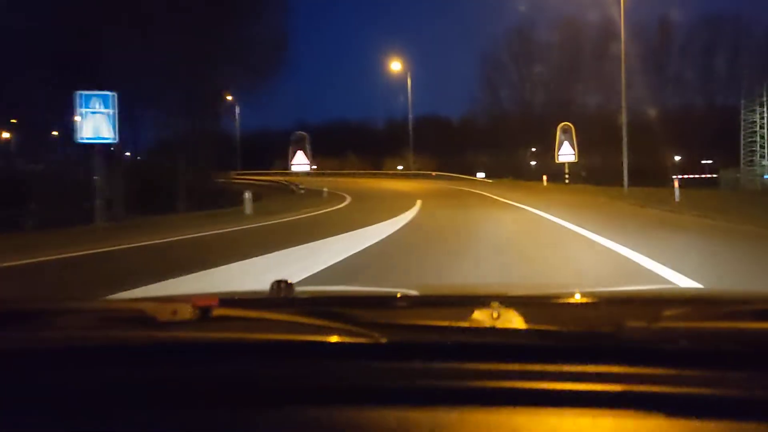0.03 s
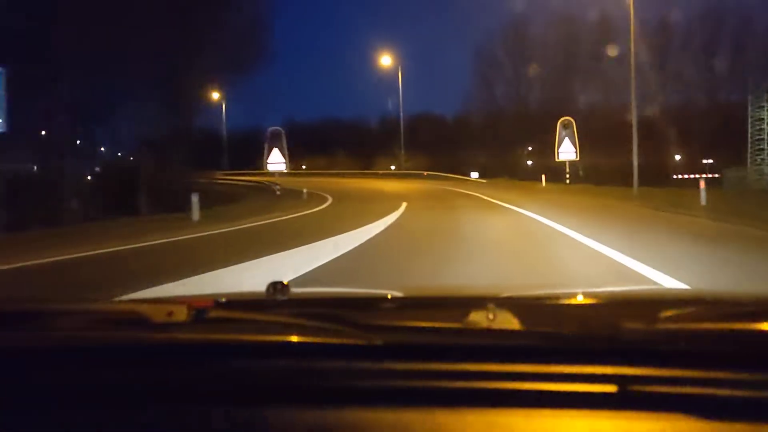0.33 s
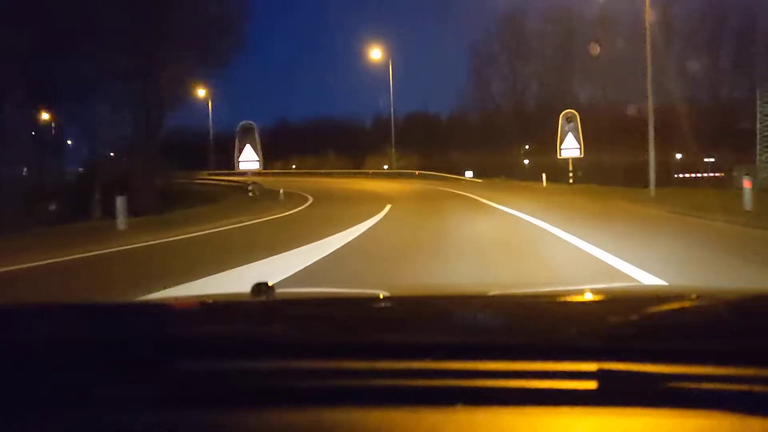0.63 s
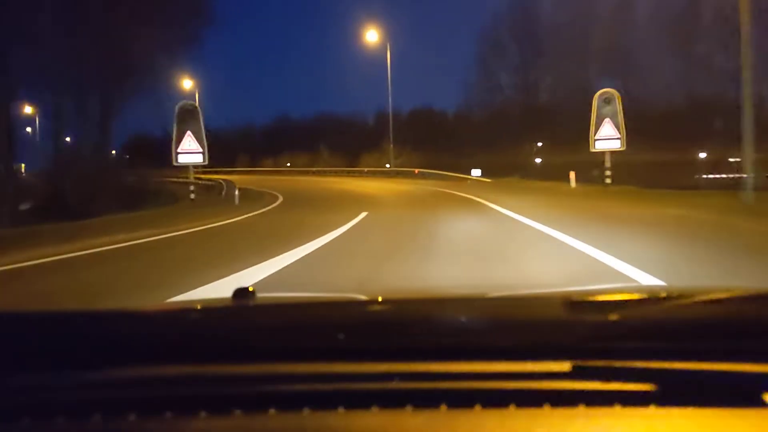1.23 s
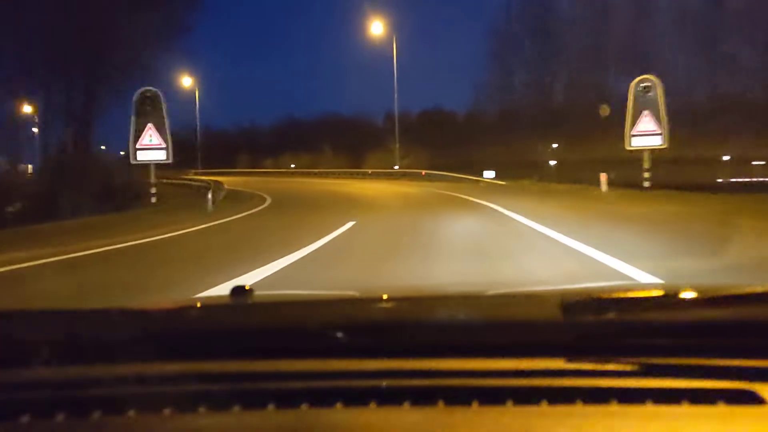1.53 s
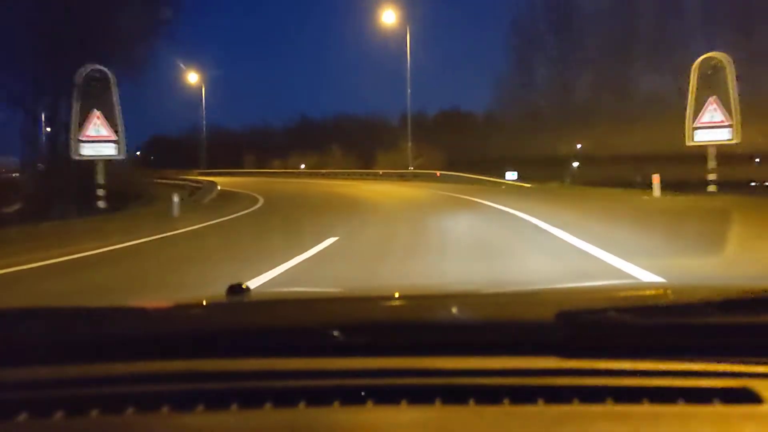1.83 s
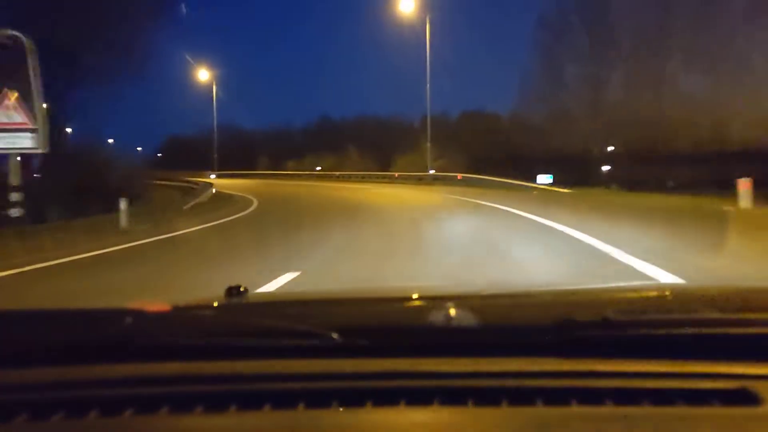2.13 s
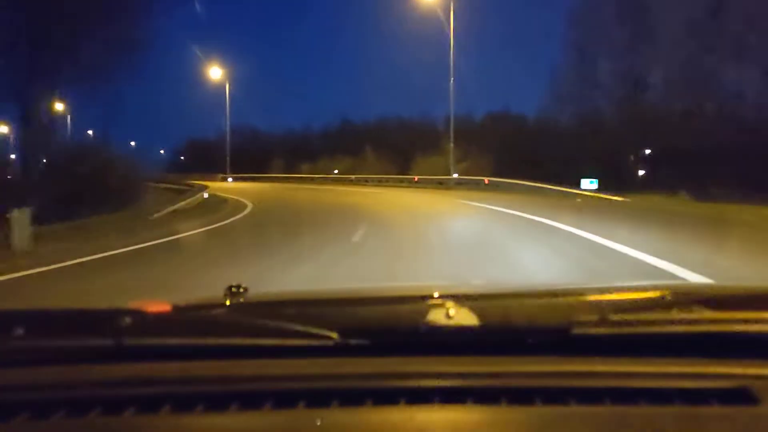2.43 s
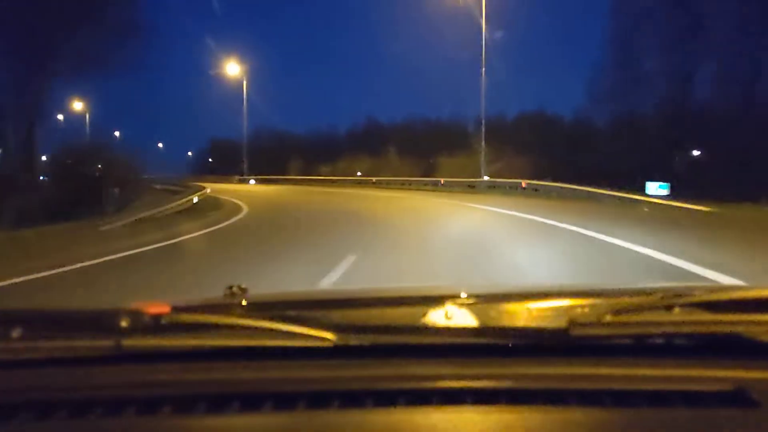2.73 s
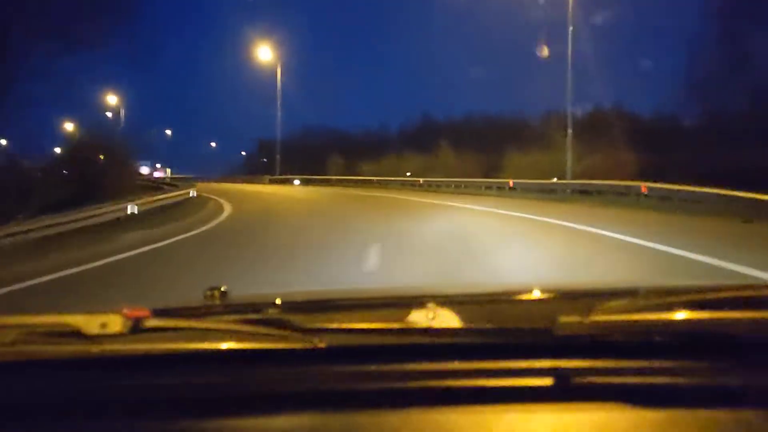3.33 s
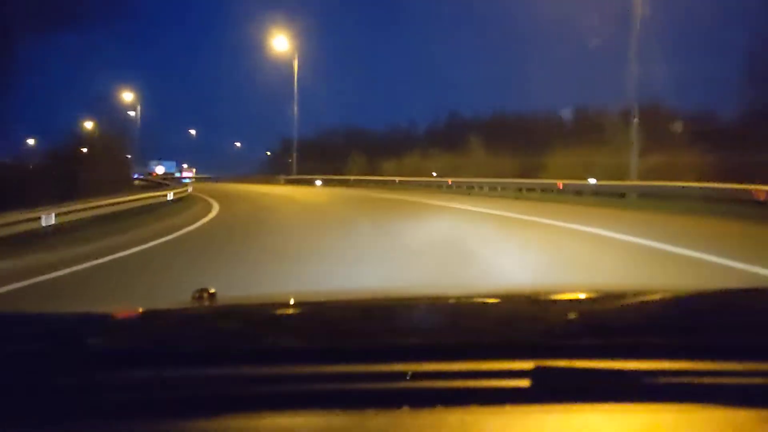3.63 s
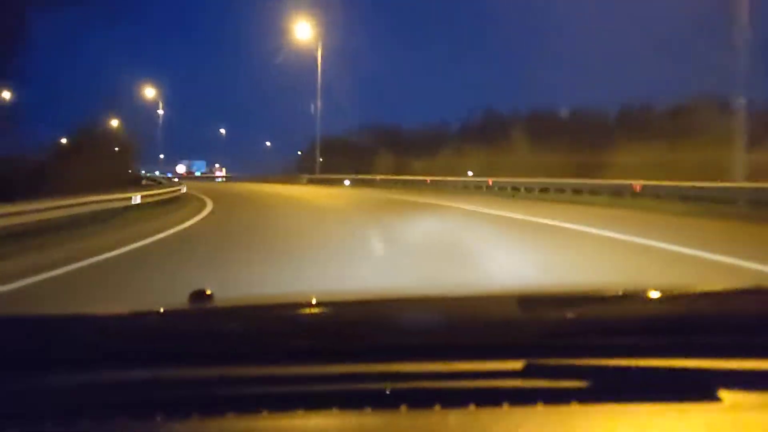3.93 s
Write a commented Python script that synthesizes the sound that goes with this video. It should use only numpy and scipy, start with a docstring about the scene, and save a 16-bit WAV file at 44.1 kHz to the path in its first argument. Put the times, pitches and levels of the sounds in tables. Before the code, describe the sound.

A turbocharged car engine accelerates, heard from inside, its deep drone climbing over road rumble with a faint rising whistle. A sharp click comes at 1.4 seconds, and the trim rattles faintly near 2.6 and 3 seconds. At 3.3 seconds the throttle shuts with three quick fluttering chuffs of air, then a hiss. Until 4 seconds the revs sink, the exhaust burbles and a hum remains.

```python
"""Inside a turbocharged six-cylinder car pulling hard through a bend. From the start, the harmonics of
the crankshaft's rotation climb as an exhaust drone over road rumble, and the turbo whistles upward.
A sharp click comes at 1.4 s; later the trim rattles faintly. At 3.3 s the throttle shuts: the trapped
boost escapes in three fluttering chuffs, then a long hiss, and rings the intake pipes. To the end the
revs sink, the exhaust burbles and a hum stays in the cabin."""
import sys
import numpy as np
from scipy import signal
from scipy.io import wavfile

SR = 44100
rng = np.random.default_rng(int(sys.argv[2]) if len(sys.argv) > 2 else 0)


def to_wav(s):
    """Save 16-bit WAV."""
    ch = np.atleast_2d(s).T  # columns
    pcm = np.round(np.clip(ch, -1, 1) * 32767)  # PCM
    wavfile.write(sys.argv[1], SR, pcm.astype(np.int16))


N = 176400
T = np.arange(N) / SR

# Stereo image of noise. Each row: frequency in Hz, left-right correlation (clipped at 1).
COHERENCE = [(270, 1.1), (500, 0.5), (1000, -0.03)]
# Each row: frequency in Hz, left minus right in dB.
SIDE_BALANCE = [(900, -0.4), (2200, 3), (6000, 2)]

# Noise spectra. Each row: frequency in Hz, relative spectral density in dB.
ROAD_SPECTRUM = [(28, -16), (55, 0.5), (100, -5), (170, -4.5), (300, -8.5), (430, -17), (560, -28.5),
                 (780, -22.5), (1400, -41)]
INTAKE_SPECTRUM = [(2000, -7.5), (3500, 3), (6400, -1.5), (7600, -7), (9500, -7.5), (11500, -16)]
CHUFF_SPECTRUM = [(900, -9), (2000, -1), (2900, 6.5), (4300, -7.5), (7300, -11.5), (10000, -25),
                  (15000, -30)]
HISS_SPECTRUM = [(2000, -3), (4000, 2.5), (7000, -2.5), (10000, -10), (12000, -17)]
ROAR_SPECTRUM = [(200, -7.5), (380, 4), (540, -2), (780, -6), (1100, -10.5), (1600, -13.5), (2200, -17.5),
                 (3300, -16.5)]

# Noise envelopes. Each row: time in seconds, level in dB.
ROAD_LEVEL = [(0, -25), (.8, -28), (1.5, -23), (3.2, -23), (4, -24.5)]
INTAKE_LEVEL = [(0, -66), (.42, -59.5), (.7, -68.5), (1.45, -59.5), (2.1, -57.5), (3.6, -53), (4, -55.5)]
ROAR_LEVEL = [(0, -45), (.35, -39), (.7, -47.5), (1.45, -37), (2, -36), (2.6, -34.5), (3.85, -31.5),
              (4, -34.5)]

# Noise bursts. Each row: peak time in seconds, level in dB, attack and decay in seconds.
TRIM_RATTLES = [(2.629, -45, .002, .005), (2.994, -45, 0.0038, .009)]
FLUTTER_CHUFFS = [(3.324, -33.5, 0.029, 0.037), (3.402, -35, 0.019, 0.036), (3.483, -37.5, 0.015, .028)]
AIR_HISSES = [(.41, -61.5, .06, .045), (3.585, -46, .09, 0.25)]

# Turbo pitch. Each row: time in seconds, frequency in Hz.
WHISTLE_PITCH = [(0, 1902), (.45, 2190), (.9, 2565), (1.27, 2935.5), (1.55, 3256), (2.6, 4397.5),
                 (3.22, 5019.5), (3.33, 5170), (3.43, 4938.5), (4, 3110.5)]
# The whistle crossing pipe and cabin resonances. Each row: peak time in seconds, level in dB.
WHISTLE_PEAKS = [(.4, -60), (.47, -56), (.86, -60), (.96, -56), (1.05, -59), (1.12, -55), (1.26, -51),
                 (1.39, -56), (1.46, -53), (1.52, -52), (1.6, -55), (1.75, -56), (1.83, -54), (2.21, -60),
                 (2.29, -56), (2.46, -61), (2.76, -62), (2.9, -58), (3.08, -60), (3.18, -61), (3.31, -54),
                 (3.38, -60), (3.95, -53)]
# Intake pipe resonances. Each entry: frequency in Hz.
INTAKE_MODES_HZ = (1260, 1844, 2156, 2645, 2950)
# Pipe notes. Each row: peak time in seconds, level in dB, attack and decay in seconds, pitch in Hz.
INTAKE_NOTES = [(3.435, -44, 0.05, 0.07, 2640), (3.66, -55, .04, .06, 4990), (3.92, -43.5, .2, .3, 1860)]
# Exhaust thumps. Each row: peak time in seconds, level in dB, decay in seconds, pitch in Hz.
EXHAUST_BURBLES = [(3.374, -11, .025, 120), (3.408, -12, .025, 85), (3.636, -5.5, .014, 90),
                   (3.697, -9, .042, 135), (3.762, -7.5, .03, 75), (3.845, -7.5, .014, 110),
                   (3.901, -7, .025, 70), (3.965, -11, .025, 70)]

# Crankshaft speed. Each row: time in seconds, turns per second.
CRANK_SPEED = [(0, 47), (0.34, 49.1), (0.9, 53.1), (1.45, 57.15), (3.31, 71.3), (3.43, 65), (3.6, 58),
               (3.78, 51.6), (4, 51.4)]
# Engine orders. Each entry: cycles per turn of the crankshaft.
MAIN_ORDERS = (2, 3, 4.5, 6)
MINOR_ORDERS = (1, 1.5, 2.5, 3.5, 4, 5, 5.5, 7, 9, 10)
# Each row: time in seconds, then the level of each main order in dB.
MAIN_LEVELS = [(0.04, -31.5, -7.5, -47, -28), (0.3, -23, -9, -38.5, -36), (0.48, -28, -7, -45, -34.5),
               (0.9, -30, -8, -44.5, -25), (1.3, -25.5, -9, -25.5, -29.5), (1.48, -21, -13, -24, -20.5),
               (1.7, -24.5, -14, -20.5, -28.5), (1.95, -20, -10.5, -21.5, -38.5),
               (2.2, -18.5, -12, -27.5, -27.5), (2.5, -16, -15.5, -37, -34),
               (2.75, -17.5, -12.7, -23.5, -35.5), (3.25, -20, -20.5, -24, -39.5),
               (3.42, -17.5, -22.5, -38, -32), (3.58, -21, -30, -46, -34.5), (3.9, -24.5, -20, -41.5, -46)]
# Low, middle and high revs. Each entry: turns per second.
MINOR_SPEEDS = (51, 59, 68.4)
# Each row: one minor order's base level in dB at those three speeds.
MINOR_LEVELS = [(-39.5, -38, -26), (-33.5, -31, -25.5), (-39.5, -33, -34.5), (-51, -34.5, -50.5),
                (-41, -43.5, -31), (-31.5, -36.5, -29.5), (-40, -34.5, -34.5), (-38, -40.5, -40),
                (-43, -48, -41), (-55, -46.5, -43)]
# Cabin response to the minor orders. Each row: frequency in Hz, gain in dB.
CABIN_RESPONSE = [(425, 0), (450, 5.5), (485, -2.5)]

LIFT_S, LIFT_FADE_S = 3.36, 0.23  # the engine sheds its load


def from_db(db):
    """Amplitude grows tenfold for every 20 dB."""
    return 10 ** (np.asarray(db) / 20)


def rms_one(x):
    """Normalisation to unit mean power."""
    return x / np.sqrt(np.mean(x ** 2) + 1e-20)


def in_time(rows, column=1):
    """Linear interpolation of one column at every sample."""
    rows = np.array(rows)
    return np.interp(T, rows[:, 0], rows[:, column])


def at_hz(rows, hz):
    """Interpolation of a spectrum on a logarithmic frequency axis."""
    rows = np.array(rows)
    return np.interp(np.log(hz), np.log(rows[:, 0]), rows[:, 1])


def drift(rate_hz):
    """Low-passed noise gives a slow random fluctuation of rms 1."""
    step, settle = 40, 2000
    pole = np.exp(-2 * np.pi * step * rate_hz / SR)
    white = rng.standard_normal(N // step + settle + 2)
    slow = signal.lfilter([1], [1, -2 * pole, pole * pole], white)[settle:]
    return np.interp(np.arange(N) / step, np.arange(len(slow)), rms_one(slow))


def drift_pair(rate_hz):
    """Uncorrelated fluctuations for left and right."""
    return np.array([drift(rate_hz), drift(rate_hz)])


def butterworth(x, order, hz, kind):
    """Filtering with a maximally flat passband."""
    return signal.sosfilt(signal.butter(order, hz, kind, fs=SR, output="sos"), x)


def swell(peak_s, db, attack, decay):
    """A Gaussian rise followed by exponential decay."""
    age = T - peak_s
    return from_db(db) * np.exp(-(np.minimum(age, 0) / attack) ** 2 - np.maximum(age, 0) / decay)


def swells(rows):
    """Incoherent bursts add in power."""
    return np.sqrt(sum(swell(*row) ** 2 for row in rows))


def tone(hz, start_cycles=0, left_lag_s=0.00033):
    """Phase is the integral of frequency; this sine of rms 1 reaches the left side late."""
    phase = 2 * np.pi * (np.cumsum(hz) / SR + start_cycles)
    return -np.sqrt(2) * np.cos([phase - 2 * np.pi * hz * left_lag_s, phase])


def noise(spectrum, flicker_db):
    """Partly coherent stereo noise of rms 1, summed from flickering third-octave bands."""
    edges = 22 * 2 ** (np.arange(30) / 3)
    sides = np.array([[1], [-1]])
    out, white = 0, rng.standard_normal((2, 2, N))
    for k, (low, high) in enumerate(zip(edges, edges[1:])):
        if high > spectrum[0][0] and low < spectrum[-1][0]:
            hz = np.sqrt(low * high)
            mid, side = butterworth(white[k % 2], 2, [low, high], "band")
            alike = np.clip(at_hz(COHERENCE, hz), -1, 1)
            band = np.sqrt(1 + alike) * mid + np.sqrt(1 - alike) * side * sides
            db = at_hz(spectrum, hz) + flicker_db * drift(14) + sides * at_hz(SIDE_BALANCE, hz) / 2
            out = out + from_db(db) * band
    return rms_one(out)


def pipe_resonance(x, ring=0.57, q=51):
    """The intake pipes reinforce sound near their natural frequencies."""
    return x + ring * sum(signal.lfilter(*signal.iirpeak(hz, q, fs=SR), x) for hz in INTAKE_MODES_HZ)


def road_rumble():
    """Random vibration from the road has its power mainly in the bass."""
    return from_db(in_time(ROAD_LEVEL)) * noise(ROAD_SPECTRUM, flicker_db=1)


def cabin_hum(hz=208, sag_hz_per_s=9.6, db=-24.5):
    """A slowly modulated sine fades in at the lift and sinks as the car coasts."""
    level = from_db(db + 2 * drift(4.1)) * np.clip((T - LIFT_S) / LIFT_FADE_S + .5, 0, 1)
    return level * tone(hz - sag_hz_per_s * (T - LIFT_S))


def trim_rattles():
    """Heavily damped rattles are heard as brief bursts of noise."""
    return swells(TRIM_RATTLES) * noise(HISS_SPECTRUM, flicker_db=2)


def click(at_s=1.4233, db=-16.5, decay_s=0.00054):
    """A short bipolar pulse has a broad spectrum: one dry click."""
    return from_db(db) * np.sign(T - at_s) * np.exp(-np.abs(T - at_s) / decay_s)


def turbo(floor_db=-73, swell_width_s=.026):
    """The compressor's tone swells as it sweeps through resonances, over broadband intake air."""
    whistle = tone(in_time(WHISTLE_PITCH) * (1 + 0.0011 * drift(35)))[1]
    peaks = sum(from_db(db) * np.exp(-((T - s) / swell_width_s) ** 2) for s, db in WHISTLE_PEAKS)
    flicker = from_db(2 * drift_pair(20))
    air = from_db(in_time(INTAKE_LEVEL)) * noise(INTAKE_SPECTRUM, flicker_db=0.5)
    return whistle * (from_db(floor_db) + peaks) * flicker + air


def blow_off(sag_hz_per_s=600, waver_hz=18):
    """Trapped boost flutters out and excites pipe resonances; the notes sink as it drains."""
    out = pipe_resonance(swells(FLUTTER_CHUFFS) * noise(CHUFF_SPECTRUM, flicker_db=2.5))
    for peak_s, db, attack, decay, hz in INTAKE_NOTES:
        note = tone(hz - sag_hz_per_s * (T - peak_s) + waver_hz * drift(20))
        out = out + swell(peak_s, db, attack, decay) * note * from_db(2 * drift_pair(20))
    return out


def air_hiss(split_hz=6400):
    """Frequency-dependent decay: escaping air dulls because its treble dies twice as fast."""
    air = noise(HISS_SPECTRUM, flicker_db=2.5)
    dull, bright = (butterworth(air, 5, split_hz, kind) for kind in ("low", "high"))
    brief = swells([(s, db, attack, decay / 2) for s, db, attack, decay in AIR_HISSES])
    return swells(AIR_HISSES) * dull + brief * bright


def exhaust_burbles(attack_per_decay=0.64, gas_db=-14):
    """Off throttle, each thump is a damped low oscillation in a puff of gas noise."""
    gas = from_db(gas_db) * noise(ROAD_SPECTRUM, flicker_db=0)
    return sum(swell(s, db, attack_per_decay * decay, decay) * (np.cos(2 * np.pi * hz * (T - s)) + gas)
               for s, db, decay, hz in EXHAUST_BURBLES)


def engine_roar(revs, roar_db, throb=0.22, bulkhead_hz=3330):
    """Three firings a turn modulate the amplitude of gas noise; the bulkhead acts as a low-pass."""
    firing_phase = 2 * np.pi * np.cumsum(3 * revs) / SR
    gas = from_db(roar_db) * (1 + throb * np.sin(firing_phase)) * noise(ROAR_SPECTRUM, flicker_db=1.5)
    return pipe_resonance(butterworth(gas, 8, bulkhead_hz, "low"))


def crank_tone(order, revs, crank_start):
    """Whole orders are phase-locked to the crank angle; half orders start at a random phase."""
    return tone(order * revs, rng.random() if order % 1 else order * crank_start)


def engine_drone(revs, roar_db, off_load_db=-9, upper_db=-53, db_per_octave=-7):
    """Periodic firing makes a harmonic series; unequal cylinders add minor orders that fade off load."""
    out, crank_start = 0, rng.random()
    for column, order in enumerate(MAIN_ORDERS, 1):
        out = out + from_db(in_time(MAIN_LEVELS, column)) * crank_tone(order, revs, crank_start)
    load_db = off_load_db * np.clip((T - LIFT_S) / LIFT_FADE_S, 0, 1)
    for order, levels in zip(MINOR_ORDERS, MINOR_LEVELS):
        db = np.interp(revs, MINOR_SPEEDS, levels) + at_hz(CABIN_RESPONSE, order * revs)
        out = out + from_db(db + load_db + 2 * drift_pair(6.2)) * crank_tone(order, revs, crank_start)
    for order in np.arange(21, 57) / 2:  # the upper orders rise and fall with the roar
        db = upper_db + db_per_octave * np.log2(order / 10) + roar_db - roar_db.mean()
        out = out + from_db(db + load_db + 5.1 * drift(2.1)) * tone(order * revs, rng.random())
    return out


def scene():
    """Superposition: the pressures of all sources add in the cabin."""
    revs = in_time(CRANK_SPEED) * (1 + .0012 * drift(6.5))
    roar_db = in_time(ROAR_LEVEL)
    pulling = road_rumble() + engine_drone(revs, roar_db) + engine_roar(revs, roar_db) + turbo()
    return pulling + blow_off() + air_hiss() + cabin_hum() + exhaust_burbles() + click() + trim_rattles()


def record(dry, low_cut_hz=33, high_cut_hz=15750):
    """Band limiting: steep filters remove the deepest bass and the highest treble."""
    dry = butterworth(dry, 8, low_cut_hz, "high")
    return signal.sosfilt(signal.ellip(10, .1, 80, high_cut_hz, fs=SR, output="sos"), dry)


dry = scene()
out = record(dry)
to_wav(out)
```